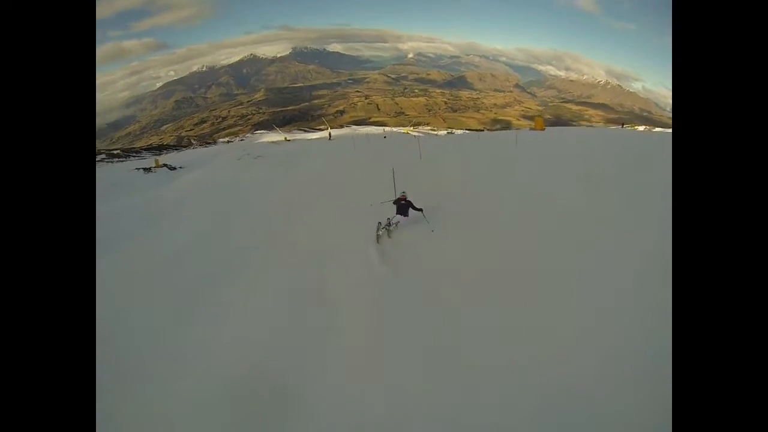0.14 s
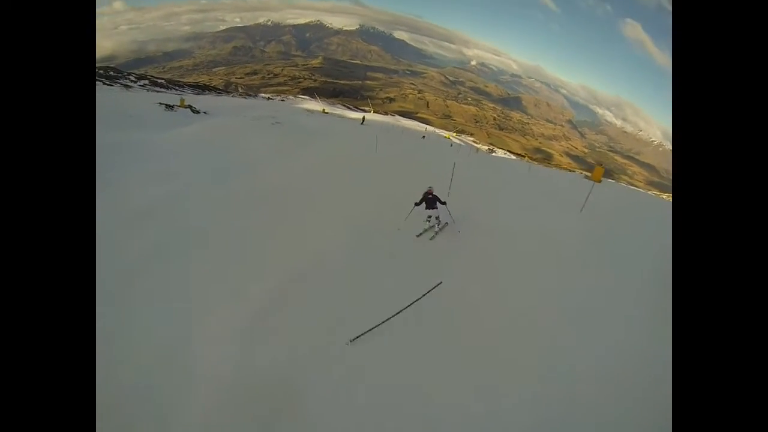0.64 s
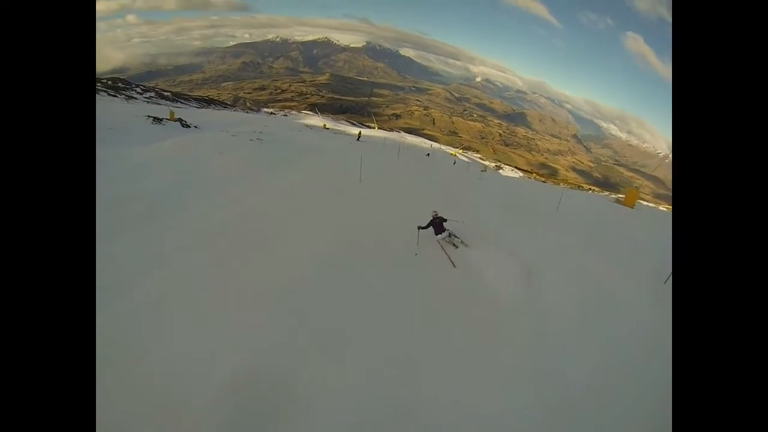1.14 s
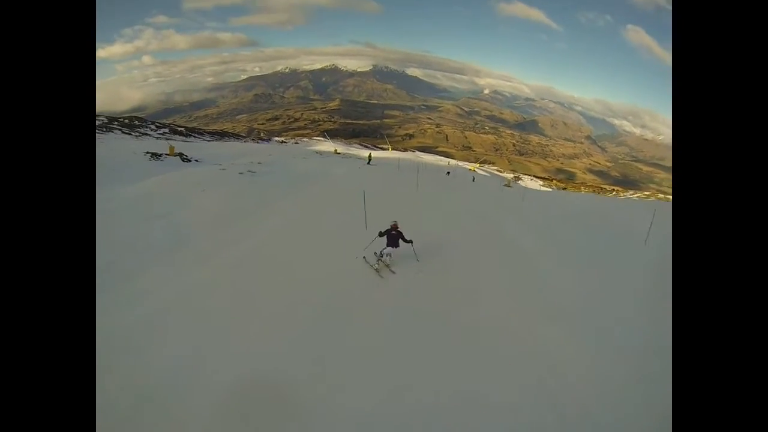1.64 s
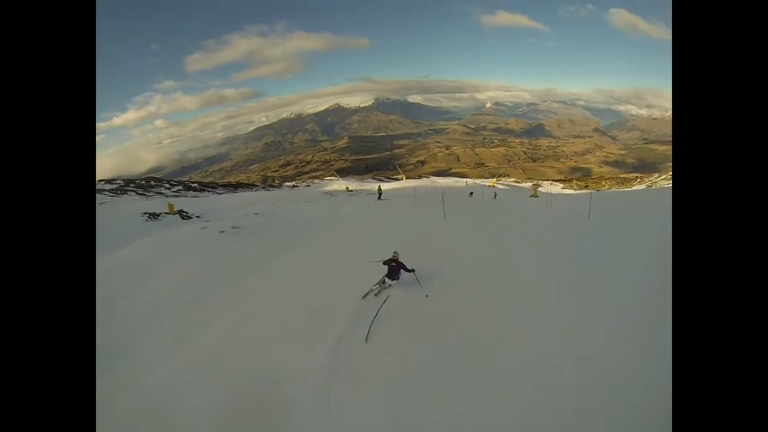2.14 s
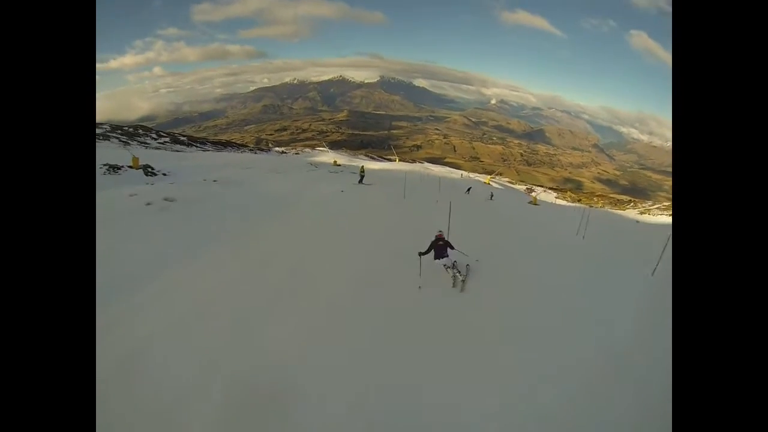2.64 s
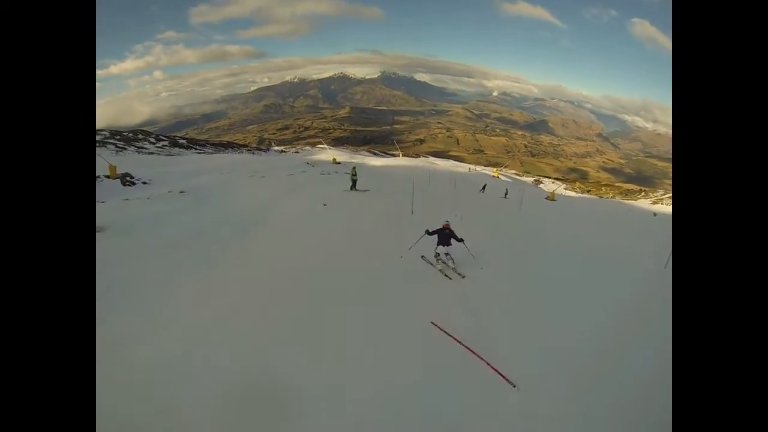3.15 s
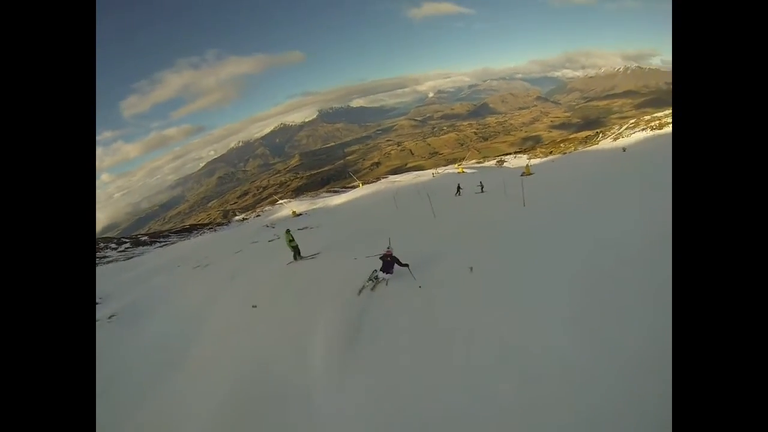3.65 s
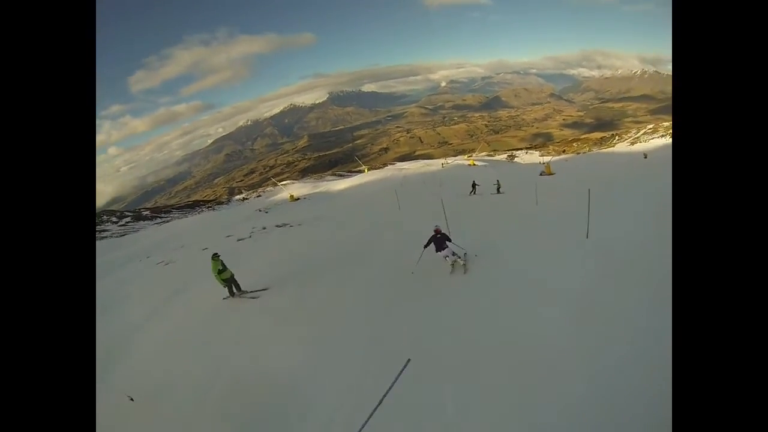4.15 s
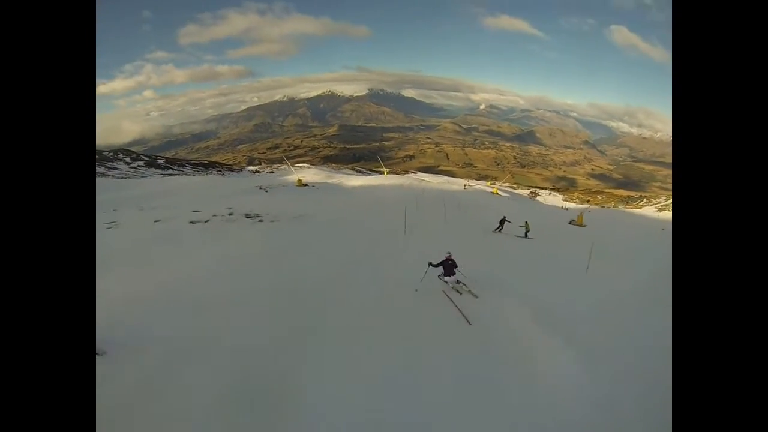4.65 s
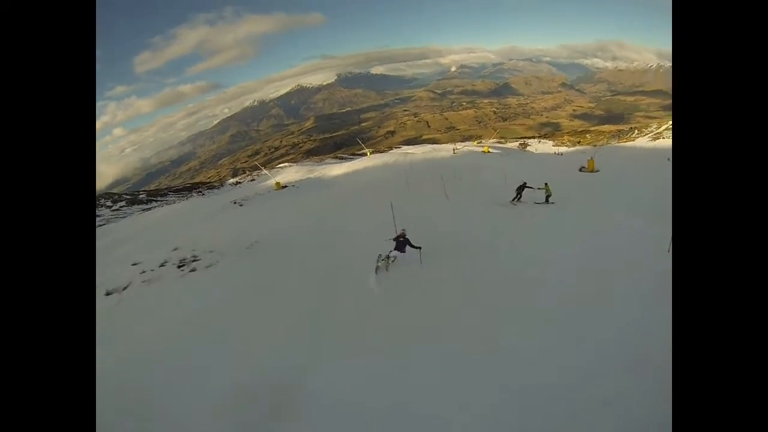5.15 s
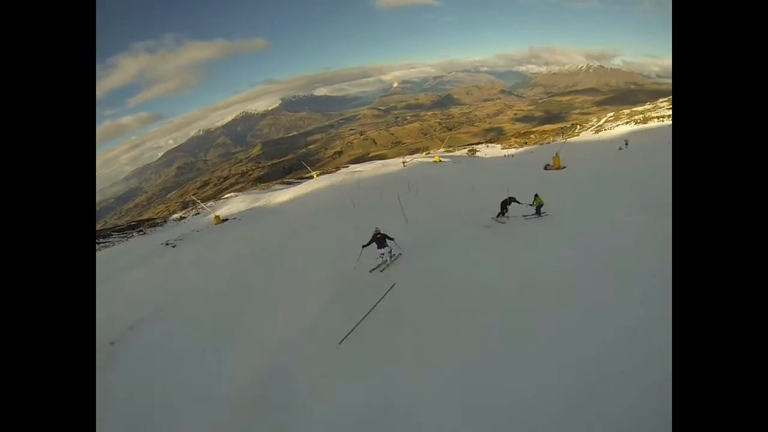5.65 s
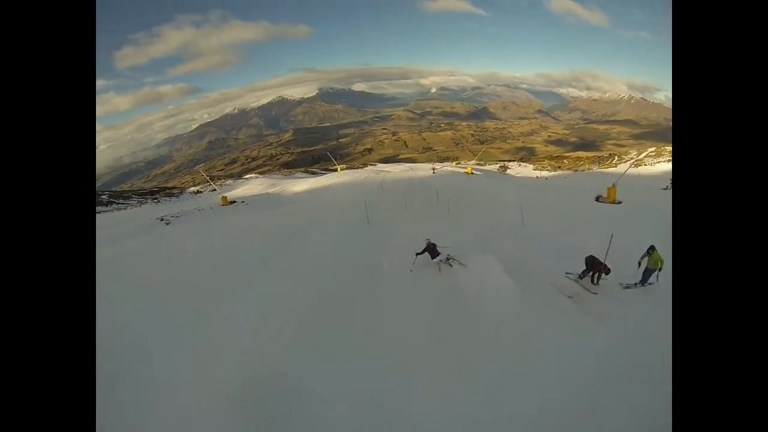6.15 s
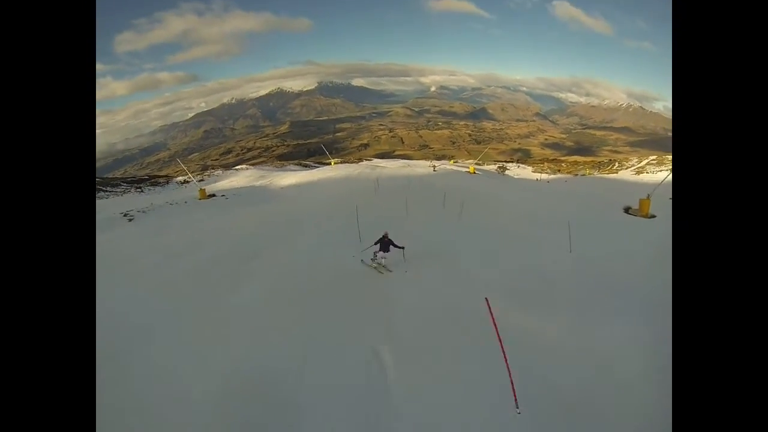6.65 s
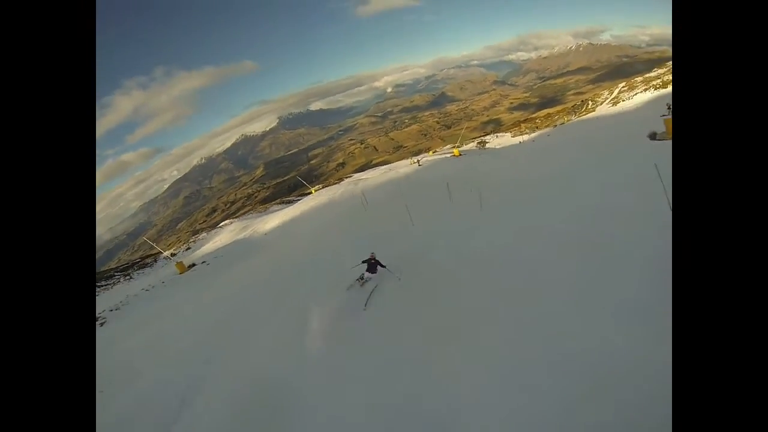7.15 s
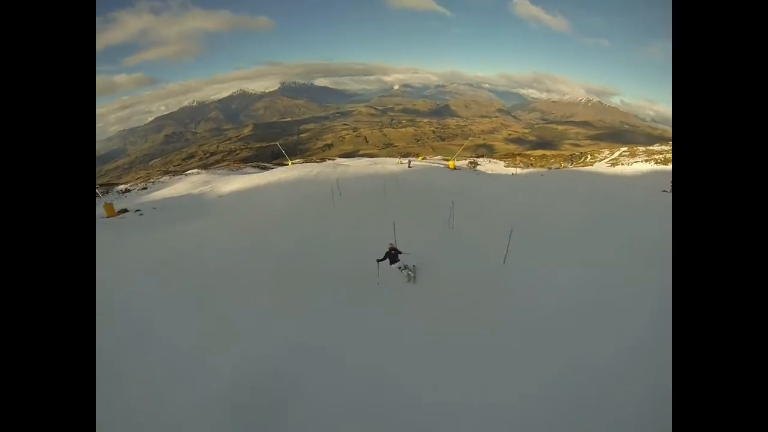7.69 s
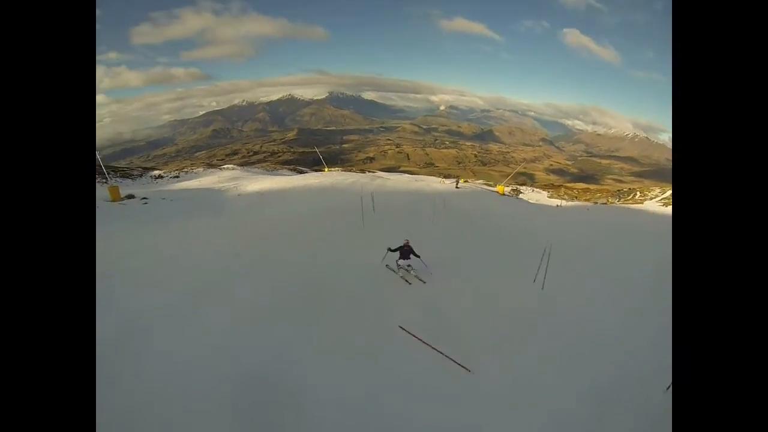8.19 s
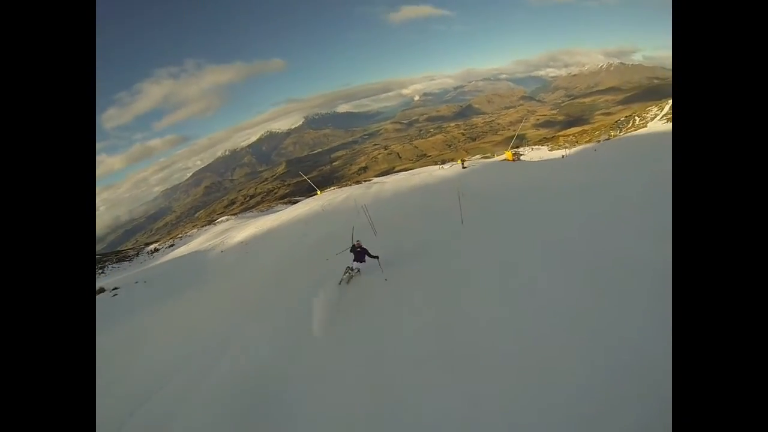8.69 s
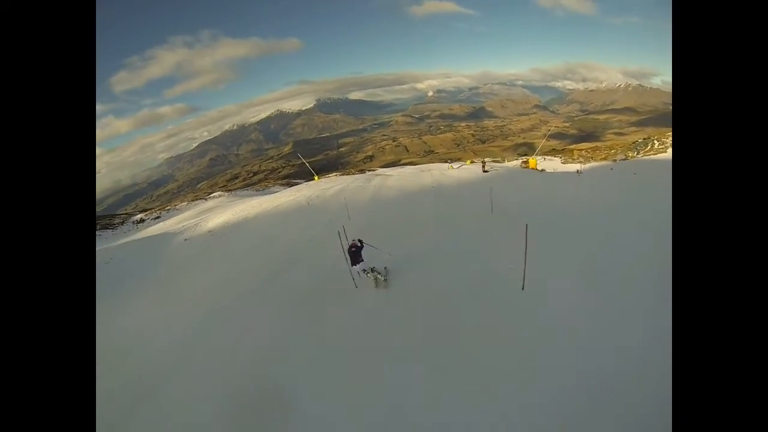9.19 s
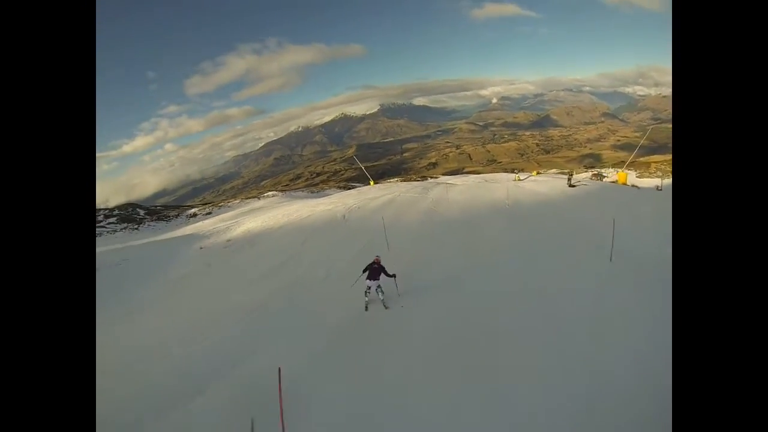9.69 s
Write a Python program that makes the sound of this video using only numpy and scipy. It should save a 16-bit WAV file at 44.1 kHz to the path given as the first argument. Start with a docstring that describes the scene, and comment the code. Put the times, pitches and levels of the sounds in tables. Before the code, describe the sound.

Close, boxy sound from inside a plastic camera case on an open ski slope. At 0 s a turn is already under way, its gritty grind and fine hiss broken almost at once by a hollow knock. Further carved turns follow roughly every 0.6 to 0.9 s, scrape swelling mid-turn, airy spray on some, then a lighter glide. Wind makes the mount throb in a wavering low hum over soft rumble, with gusts near 0.7 and 2 s. Knocks are scattered at first, with pairs near 1.9 s, a sharp clack at 3.55 s and a cluster of thuds from 4.2 to 4.6 s. The hardest bang lands at 6.2 s. After about 7.3 s the hum climbs and strengthens, flapping roughens it, and clacks, ticks and ice spits crowd together, especially at 7.6-8.9 s. Gusts ease slightly after 9 s, but dense rattling and scraping continue to the cutoff near 10 s.

```python
"""First comes the grind and hiss of a ski turn already under way, broken almost at once by a knock.
A skier carries a small camera in a closed plastic case down a firm slope, one carved turn after another.
Wind shakes the mount: wavering sine hums over a rumble of shaped noise. Shaped noise also makes the skis,
louder in each turn. Jolts knock camera and case: short pushes set off fading tones of its air and walls."""
import sys
import numpy as np
from scipy import signal
from scipy.fft import rfft, irfft, next_fast_len
from scipy.io import wavfile
from scipy.ndimage import uniform_filter1d

SR = 44100
rng = np.random.default_rng(int(sys.argv[2]) if len(sys.argv) > 2 else 0)


def unload_wav(signal):
    """Save mono or channel-first audio to the path in sys.argv[1] as 16-bit WAV at rate SR, clipped to [-1, 1]."""
    wavfile.write(
        sys.argv[1],
        SR,
        np.round(np.clip(np.atleast_2d(signal).T, -1, 1) * 32767).astype(np.int16),
    )


def voltage_ratio(decibels):
    """Convert decibels (scalar or array-like) to amplitude ratios, 20 dB per decade."""
    exponent = np.asarray(decibels, float) / 20
    return 10 ** exponent


N = 432621  # length in samples

# faint hiss of the camera's electronics: pitch_hz, relative level_db
SELF_NOISE = [(4000, -8), (6000, -12), (10300, -16.5), (13300, -10), (14800, -39)]
SELF_NOISE_DB = -77
# thin tones of the camera: pitch_hz, level_db (peak)
WHINE = [(6445, -75), (12890, -78)]

# how fast the mount shakes, which follows speed: start_s, rate_hz
SHAKE = [(0, 64), (.8, 70), (2.6, 73), (3.4, 73), (4.4, 65), (5.27, 66), (6.1, 74), (6.7, 69), (7.3, 89),
         (8.2, 97), (9.2, 96), (9.81, 100)]
SLOW_SHAKE_HZ = 70
# gusts that set the mount humming: peak_s, hum_db
GUSTS = [(.07, -31), (.28, -31), (.43, -24), (.7, -17.5), (.86, -29), (1.27, -35), (1.4, -33),
         (1.65, -23.5), (1.82, -22), (1.93, -21), (2.03, -25), (2.47, -21), (2.59, -25), (2.76, -23.5),
         (3.15, -25.5), (3.31, -29.5), (3.57, -33), (3.82, -28.5), (4.1, -25), (4.28, -27), (4.47, -30),
         (4.72, -29), (4.99, -25), (5.23, -20), (5.34, -25), (5.69, -22), (5.87, -19), (5.98, -20.5),
         (6.14, -18), (6.33, -15), (6.52, -28), (6.82, -16.5), (6.98, -20.5), (7.16, -20), (7.34, -19.5),
         (7.53, -16.5), (7.7, -15), (7.82, -17), (8.038, -15.5), (8.161, -16.5), (8.421, -16),
         (8.589, -13.5), (8.849, -13), (8.941, -18), (9.15, -22.5), (9.3, -19), (9.549, -20), (9.66, -20.5),
         (9.78, -23.5)]
GUST_RISE_S, GUST_FALL_S = 0.043, 0.064
# low rumble of the shaken case: pitch_hz, relative level_db (per Hz)
BUFFET = [(15, 1.5), (24, 10), (36, -15), (60, 8), (120, -6), (170, -17.5), (230, -36)]
# higher flapping brought up by speed: pitch_hz, relative level_db (per Hz)
FLAP = [(170, 1.5), (300, -6.5), (450, -7), (800, -25), (1200, -13.5)]
# tones of the mount when it hits its stop: pitch_hz, relative level_db, time to fade by 60 dB_s
MOUNT_MODES = [(193, 1, 0.058), (290, -3.5, .025), (390, -2, .022), (480, -3, .025)]
LULL_HUM_DB, LULL_BUFFET_DB, GUST_BUFFET_DB, JOLT_BUFFET_DB = -37, -28.5, -13, -1
JOLT_RISE_S, JOLT_SWAY_S = 0.04, 0.086
# upper hum: ratio to the shaking rate, limit before its wobble, level outside gusts
UPPER_RATIO, UPPER_TOP_HZ, UPPER_STEADY_DB = 1.88, 191, -42

# ski turns: start_s, end_s, scrape_db at full load, edge hiss_db, spray_db (all before flicker)
TURNS = [(-.3, 0.143, -35.5, -54.5, -74), (0.626, 1.122, -36, -51.5, -69.5), (1.55, 2.223, -33.5, -51, -64),
         (2.41, 2.81, -40.5, -51.5, -70.5), (3.04, 3.742, -36.5, -51, -63.5), (4.25, 4.749, -35, -51, -68),
         (4.998, 5.526, -34, -51, -64.5), (5.862, 6.347, -34, -48.5, -69), (6.7, 7.213, -35, -52.5, -63),
         (7.544, 7.955, -35, -49, -65.5), (8.245, 8.846, -33.5, -50, -61.5),
         (8.897, 9.505, -35.5, -52.5, -69), (9.59, 10.005, -35.5, -57, -72)]
# tone colour of skis grinding the crust: pitch_hz, relative level_db (per Hz)
SCRAPE = [(530, -49.5), (900, -23), (1130, -17), (1190, -13.5), (1450, 0), (1720, -1), (2020, -13),
          (3020, -14), (3330, -21.5), (5320, -28.5), (6200, -33), (8060, -59)]
# tone colour of the edge hiss: pitch_hz, relative level_db (per Hz)
HISS = [(2600, 8), (3300, 12.5), (4400, -11.5), (5000, 1), (5900, -7), (6800, 1), (7600, 6), (8500, -3),
        (9300, -5.5)]
# tone colour of thrown spray: pitch_hz, relative level_db (per Hz)
SPRAY = [(8500, -5.5), (9500, -3), (10900, -6.5), (11400, -14.5), (13000, -15), (14500, -29.5)]
# tone colour of the narrower edge fizz: pitch_hz, relative level_db (per Hz)
EDGE = [(3800, -11), (4600, -5.5), (5400, -6), (5800, -17)]
GLIDE_SCRAPE_DB, GLIDE_HISS_DB, GLIDE_SPRAY_DB = -45.5, -67, -79.5
GLIDE_SCRAPE_PER_SPEED, FULL_LOAD_AT = 2.3, 0.41  # dB per dB of speed; share of the turn
EDGE_SET_S, HISS_SET_S, SPRAY_SET_S, EDGE_LIFT_S = 0.31, 0.28, 0.076, 0.17
EDGE_DB, OTHER_SIDE_DB = -5, -16  # fizz against the hiss; added change in turns to the other side

# loose ice chips striking the case: start_s, relative level_db
CHIPS = [(0.155, -38), (1.877, -34), (3.5558, -39.5), (4.384, -43), (5.2323, -38.5), (6.001, -44.5),
         (6.341, -43), (7.771, -39.5), (8.6563, -42.5), (9.6097, -45), (9.647, -47)]
# tone colour of a chip: pitch_hz, relative level_db (per Hz)
CHIP = [(2500, 4.5), (5000, 2.5), (7500, -5), (9000, -4.5), (12000, -4), (14500, -12.5)]
CHIP_DECAY_S = 0.0045
# hollow knocks on the case wall: start_s, push_db
HOLLOW = [(.044, -22), (3.408, -29.5), (6.2405, -13.5), (6.6992, -29), (8.3853, -16.5), (8.9116, -23.5),
          (9.2884, -16)]
# tones of the flat wall: pitch_hz, relative level_db, time to fade by 60 dB_s
HOLLOW_MODES = [(505, -4, 0.04), (610, -3.5, 0.03), (783, -7.5, 0.02)]
# tone colour of the shuddering walls: pitch_hz, relative level_db (per Hz)
THUD_TAIL = [(200, 1.5), (480, -0.5), (800, -10.5)]
THUD_TAIL_DB, THUD_TAIL_S = -8, 0.021  # against the thud push; decay

# jolts of camera against case, alone or in quick bursts: start_s, ring push_db, thud push_db, tick push_db
KNOCKS = [(0.046, -20, -44, -50), (0.153, -22, -64, -23.5), (0.43, -38, -38.5, -55), (0.689, -29, -51, -23),
          (0.7019, -20.5, -33.5, -33), (0.9285, -17, -61, -28), (1.256, -16.5, -31, -52),
          (1.3137, -23.5, -32, -56), (1.39, -15, -30, -43), (1.5965, -19.5, -35, -22),
          (1.609, -17, -34, -27), (1.8582, -11, -22, -40), (1.9442, -11, -22.5, -40),
          (2.0509, -14, -35, -43), (2.16, -25, -32.5, -51), (2.565, -14.5, -28.5, -38),
          (2.7374, -42, -38, -27.5), (2.954, -21, -38.5, -43), (3.326, -31, -32, -25),
          (3.5505, -8.5, -22, -28), (3.559, -24, -53, -24.5), (4.0312, -19, -37, -22.5),
          (4.197, -38, -35, -60), (4.2133, -13.5, -25, -35), (4.2611, -13.5, -24, -38),
          (4.332, -14.5, -38, -50), (4.3828, -18.5, -57, -19.5), (4.409, -20, -30, -55),
          (4.468, -9, -22, -31), (4.54, -18, -28, -34), (4.5959, -8, -21.5, -25),
          (5.0145, -13.5, -27.5, -42), (5.135, -18.5, -42, -38), (5.1771, -13.5, -25.5, -53),
          (5.2084, -18, -39, -44), (5.231, -32, -47, -25.5), (5.5903, -23.5, -32.5, -53),
          (5.6391, -8.5, -21.5, -31), (6.0008, -24, -31, -28), (6.2118, -2, -14.5, -23),
          (6.245, -9, -49, -50), (6.333, -8, -21, -40), (6.5513, -12.5, -37, -25),
          (6.849, -8.5, -20.5, -29), (6.895, -21, -42, -25.5), (6.934, -11.5, -36, -39),
          (6.9663, -15.5, -27, -45.5), (7.3635, -9.5, -29.5, -24.5), (7.5796, -18, -28, -53),
          (7.6528, -13.5, -20, -27), (7.7282, -12.5, -23, -49), (7.7721, -17.5, -57, -14.5),
          (7.8067, -13.5, -48, -48), (7.823, -15.5, -23.5, -45), (8.079, -14.5, -29.5, -23.5),
          (8.1422, -18, -21.5, -20), (8.3424, -16.5, -42, -43), (8.3547, -11.5, -23.5, -42),
          (8.371, -13, -35, -40), (8.386, -14, -35, -45), (8.4073, -15.5, -39, -27), (8.431, -15, -44, -49),
          (8.63, -16.5, -35, -24.5), (8.8389, -7.5, -22.5, -51), (9.198, -18, -36, -36),
          (9.2084, -17, -24.5, -47), (9.289, -15, -21.5, -40), (9.4835, -8.5, -30, -27),
          (9.54, -19, -31, -63), (9.588, -42, -55, -24.5), (9.6123, -8, -22, -19), (9.621, -6.5, -36, -49),
          (9.638, -14, -23.5, -52), (9.699, -19, -26.5, -47), (9.7523, -13, -31, -47),
          (9.764, -23, -46, -23.5), (9.7784, -18.5, -47, -45)]
# quick runs of chatter at speed: first_s, last_s, ring push_db, thud push_db
RUNS = [(7.68, 7.7, -13.5, -30), (8.808, 8.862, -12.5, -26.5), (9.031, 9.066, -15.5, -31)]
RUN_GAP_S, RUN_SCATTER_DB, RUN_TICK_DB = 0.011, 3, -34.5  # rough gap between blows
# ringing air in the case: pitch_hz, relative level_db, time to fade by 60 dB_s
AIR_MODES = [(1470, -4.5, 0.027), (1726, 0.5, 0.0093), (2270, -17.5, 0.023), (3930, -21, 0.014)]
# dull thud of the walls: pitch_hz, relative level_db, time to fade by 60 dB_s
THUD_MODES = [(121.3, 8, 0.058), (196, 0.5, 0.036), (296, -5, 0.02), (455, -2.5, 0.033), (585, -1, 0.0097),
              (750, 2, 0.012)]
# hard tick of the contact: pitch_hz, relative level_db, time to fade by 60 dB_s
TICK_MODES = [(2970, 8.5, 0.0025), (3920, -11.5, 0.0066), (4940, -1.5, 0.0035), (6280, -13.5, 0.011),
              (7300, -18.5, .006), (12500, -16.5, .003)]


def curve(table):
    """Draws straight lines between table points, giving each column one value a sample."""
    s, *columns = np.transpose(table)
    return [np.interp(np.arange(N) / SR, s, c) for c in columns]


def unit(x):
    """Scales a signal to rms 1."""
    return x / np.sqrt(np.mean(x ** 2))


def coloured(x, spectrum):
    """Shapes the spectrum through pitch and level points, falling away outside them; rms 1."""
    hz, db = np.transpose(spectrum)
    size = next_fast_len(N)
    log_hz = np.log(np.fft.rfftfreq(size, 1 / SR) + 1)
    outside = np.maximum(np.log(hz[0]) - log_hz, 0) + np.maximum(log_hz - np.log(hz[-1]), 0)
    gain = voltage_ratio(np.interp(log_hz, np.log(hz), db) - 60 * outside)
    return unit(irfft(rfft(x, size) * gain, size)[:N])


def walk(rate):
    """Wanders at random: levels held about 1 / rate seconds, smoothed twice, with spread 1."""
    hold = int(SR / rate)
    steps = np.repeat(rng.standard_normal(N // hold + 1), hold)
    return unit(uniform_filter1d(uniform_filter1d(steps, hold), hold)[:N])


def ring(push, modes, contact_s):
    """Pushes strike a set of fading tones; a longer contact softens the push and sounds duller."""
    contact = np.hanning(int(contact_s * SR) + 3)
    push = signal.fftconvolve(push, contact / contact.sum())[:N]
    out = 0
    for hz, db, t60 in modes:
        pole = np.exp(2j * np.pi * hz / SR - np.log(1000) / (t60 * SR))
        out = out + voltage_ratio(db) * signal.lfilter([1], [1, -pole], push).imag
    return out


def blows(times, dbs, chance, bounce_s):
    """A push at each time, followed within bounce_s by uneven ones as the parts settle."""
    push = np.zeros(N)
    at = (np.asarray(times) * SR).astype(int)
    np.add.at(push, at, voltage_ratio(dbs))
    # half of the random columns set the delay, half the size and direction
    for late, size in zip(*np.split(chance.T, 2)):
        bounce_at = np.minimum(at + (late * bounce_s * SR).astype(int), N - 1)
        np.add.at(push, bounce_at, voltage_ratio(dbs) * 0.63 * (size - .5))
    return push


def case(ring_push, thud_push, tick_push):
    """The case answers a blow with its air ring, a dull wall thud and a hard tick."""
    no_bass = signal.butter(3, 1150, "high", fs=SR, output="sos")  # little of the air ring lies below
    air = signal.sosfilt(no_bass, ring(ring_push, AIR_MODES, 0.00027))
    return air + ring(thud_push, THUD_MODES, 0.0014) + ring(tick_push, TICK_MODES, .00014)


def bells(events, rise_s, fall_s):
    """Sums bell-shaped swells, one for each (peak_s, level_db) event."""
    t = np.arange(N) / SR
    return sum(voltage_ratio(db) * np.exp(-((t - s) / np.where(t < s, rise_s, fall_s)) ** 2) for s, db in events)


def electronics():
    """Two thin, wavering tones of the camera itself, and faint hiss that differs left and right."""
    t = np.arange(N) / SR
    tones = sum(voltage_ratio(db) * np.sin(2 * np.pi * hz * t + 1.5 * walk(150.)) for hz, db in WHINE)
    hiss = np.array([coloured(v, SELF_NOISE) for v in rng.standard_normal((2, N))])
    return tones + voltage_ratio(SELF_NOISE_DB) * hiss


def speed_db():
    """Speed, taken as the shaking rate over its slow value, in dB."""
    return 20 * np.log10(curve(SHAKE)[0] / SLOW_SHAKE_HZ)


def gusts():
    """Each gust of wind swells quickly and fades as a bell."""
    return bells(GUSTS, GUST_RISE_S, GUST_FALL_S)


def jolts():
    """Each thud, and the start of each run, throws the mount, which then sways to rest."""
    thuds = [(s, db) for s, _, db, _ in KNOCKS] + [(s, db) for s, _, _, db in RUNS]
    return bells(thuds, JOLT_RISE_S, JOLT_SWAY_S)


def wind():
    """The mount shakes unevenly: two hums over gusty rumble; speed brings up a higher flapping."""
    hz, fast_db, blow = curve(SHAKE)[0], speed_db(), gusts()
    gust = walk(13.0)
    phase = 2 * np.pi * np.cumsum(hz * (1 + 0.0557 * walk(25.))) / SR
    hum = np.sin(phase) * voltage_ratio(0.5 * gust + 2.1 * walk(30.))
    swing = (voltage_ratio(LULL_HUM_DB) + blow) * unit(hum)

    upper_hz = np.minimum(UPPER_RATIO * hz, UPPER_TOP_HZ) * (1 + 0.0248 * walk(15.))
    upper_tone = np.sin(2 * np.pi * np.cumsum(upper_hz) / SR)
    upper = voltage_ratio(0.5 * fast_db + 3.6 * walk(13.0)) * upper_tone
    upper = (voltage_ratio(UPPER_STEADY_DB) + voltage_ratio(-22.0) * blow) * upper

    # wide swings meet the stop and ring the mount
    stop_push = np.maximum(swing - voltage_ratio(-20.0), 0) * voltage_ratio(4.6 * walk(60.))
    stop = voltage_ratio(-46.5 + 2.0 * fast_db) * unit(ring(stop_push, MOUNT_MODES, 0.00042))

    rough = voltage_ratio(0.6 * gust + 2.95 * walk(25.))
    buffet = voltage_ratio(-0.7 * fast_db) * coloured(rng.standard_normal(N) * rough, BUFFET)
    flap = voltage_ratio(-24.5 + 1.9 * fast_db) * coloured(rng.standard_normal(N) * rough, FLAP)
    shaken = voltage_ratio(LULL_BUFFET_DB) + voltage_ratio(GUST_BUFFET_DB) * blow + voltage_ratio(JOLT_BUFFET_DB) * jolts()
    return swing + stop + upper + shaken * (buffet + flap)


def scrape_db():
    """The grind builds to full load within the turn and sinks to a glide that grows with speed."""
    t = np.arange(N) / SR
    glide = GLIDE_SCRAPE_DB + GLIDE_SCRAPE_PER_SPEED * speed_db()
    db = glide
    for start, end, full_db, _, _ in TURNS:
        full_at = start + FULL_LOAD_AT * (end - start)
        load = np.interp(t, [start - EDGE_SET_S / 2, full_at, end + EDGE_SET_S / 2], [0, 1, 0])
        db = db + load * (full_db - glide)
    return db


def rattle(count=1100):
    """Small loose knocks that follow the roughness under the skis; few stand out."""
    chance = rng.random((count, 8))
    s = chance[:, 0] * (N - 1) / SR
    db = scrape_db()[(s * SR).astype(int)] - 2.2 * np.log(1 - .98 * chance[:, 1])
    push = blows(s, db, chance[:, 2:], 0.00496)
    return case(voltage_ratio(-5.5) * push, voltage_ratio(-9.0) * push, voltage_ratio(-10.0) * push)


def fading_noise(times, dbs, decay_s, colour):
    """Each start sets off a burst of shaped noise that dies away smoothly."""
    push = np.zeros(N)
    push[(times * SR).astype(int)] = voltage_ratio(dbs)
    fade = signal.lfilter([1], [1, -np.exp(-1 / (decay_s * SR))], push)
    return fade * coloured(rng.standard_normal(N), colour)


def chips():
    """Each ice chip that strikes the case is a short bright spit of noise."""
    s, db = np.transpose(CHIPS)
    return fading_noise(s, db, CHIP_DECAY_S, CHIP)


def hollow():
    """Blows on the flat of the wall ring between thud and air."""
    s, db = np.transpose(HOLLOW)
    return ring(blows(s, db, rng.random((len(s), 4)), 0.00484), HOLLOW_MODES, 0.00086)


def shudder():
    """After each listed thud the walls shudder on for a moment, low and ragged."""
    s, _, db, _ = np.transpose(KNOCKS)
    return fading_noise(s, db + THUD_TAIL_DB, THUD_TAIL_S, THUD_TAIL)


def knocks():
    """Hard jolts and quick runs: ring, thud and tick come in shares that differ from blow to blow."""
    rows = list(KNOCKS)
    for first, last, ring_db, thud_db in RUNS:
        times = np.linspace(first, last, round((last - first) / RUN_GAP_S) + 1)
        scatter = RUN_SCATTER_DB * rng.standard_normal((8, 3))  # enough rows for the longest run
        rows += [(s, *(d + [ring_db, thud_db, RUN_TICK_DB])) for s, d in zip(times, scatter)]
    s, ring_db, thud_db, tick_db = np.transpose(rows)
    chance = rng.random((len(s), 12))
    ring_push = blows(s, ring_db, chance[:, :6], 0.00313)
    thud_push = blows(s, thud_db, chance, 0.00918)
    tick_push = blows(s, tick_db, chance, .005)
    return case(ring_push, thud_push, tick_push)


def on_edge(column, glide_db, set_s):
    """Level in dB: rises as the edges set, holds through the turn, drops to the glide as they lift."""
    t = np.arange(N) / SR
    db = glide_db
    for turn in TURNS:
        setting = np.clip((t - turn[0]) / set_s + .5, 0, 1)
        lifting = np.clip((turn[1] - t) / EDGE_LIFT_S + .5, 0, 1)
        db = db + setting * lifting * (turn[column] - glide_db)
    return db


def edge_db():
    """Level of the fizz, strong in every other turn, when the case faces the working edge."""
    side_db = np.zeros(N)
    for start, end, *_ in TURNS[::2]:
        side_db[max(int(start * SR), 0):int(end * SR)] = OTHER_SIDE_DB
    smooth_side_db = uniform_filter1d(side_db, int(EDGE_SET_S * SR))
    return on_edge(column=3, glide_db=GLIDE_HISS_DB, set_s=EDGE_SET_S) + EDGE_DB + smooth_side_db


def skis():
    """Edges grind the crust and chatter; hiss, fizz and thrown spray grow while the skis are on edge."""
    chatter = 0.99 * walk(30.) + 1.74 * walk(90.) + 1.78 * walk(350.)
    hiss_db = on_edge(column=3, glide_db=GLIDE_HISS_DB, set_s=HISS_SET_S)
    spray_db = on_edge(column=4, glide_db=GLIDE_SPRAY_DB, set_s=SPRAY_SET_S)
    # colour, level in dB, share of the chatter, flicker in dB, stereo width
    layers = ((SCRAPE, scrape_db(), .8, 1.0, .03), (HISS, hiss_db, .3, 1.2, .3),
              (SPRAY, spray_db, .3, 1.5, .6), (EDGE, edge_db(), .4, 1.5, .15))
    out = 0
    for colour, db, share, flicker_db, width in layers:
        mid, side = (coloured(v, colour) for v in rng.standard_normal((2, N)))
        flicker = flicker_db * (walk(30.) + 0.95 * walk(9.))
        # left and right differ a little, most in the treble layers
        stereo = mid + width * side * np.array([[1], [-1]])
        out = out + voltage_ratio(db + share * chatter + flicker) * stereo
    return out


def scene():
    """Adds up all that is heard inside the case."""
    return electronics() + wind() + rattle() + chips() + hollow() + shudder() + knocks() + skis()


def roll_off(x):
    """The treble ends steeply here."""
    return signal.sosfilt(signal.butter(12, 15300, fs=SR, output="sos"), x)


def record(dry):
    """Rounds peaks, closes the end softly, sets left one sample late and draws the bass together."""
    dry = signal.sosfilt(signal.butter(1, 12, "high", fs=SR, output="sos"), dry)
    closing = np.minimum(np.arange(N)[::-1] / 200, 1)  # over the last 200 samples
    dry = np.tanh(dry) * closing
    left, right = np.append(0, dry[0, :-1]), dry[1]
    mid = (left + right) / 2
    side = (left - right) / 2
    # most of the left-right difference below 800 Hz is taken away
    side = side - 0.9 * signal.sosfiltfilt(signal.butter(2, 800, fs=SR, output="sos"), side)
    return roll_off(np.array([mid + side, mid - side]))


dry = scene()
out = record(dry)
unload_wav(out)
```